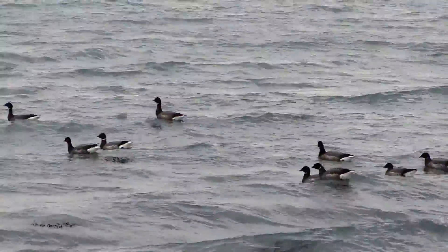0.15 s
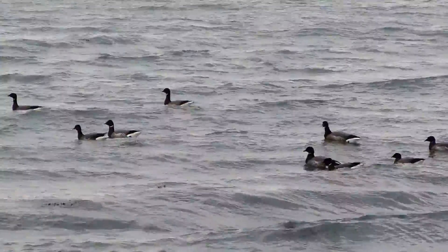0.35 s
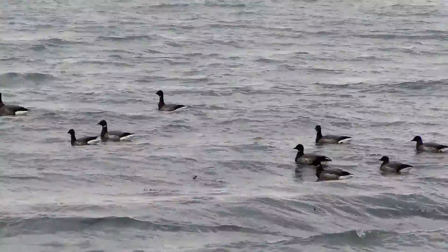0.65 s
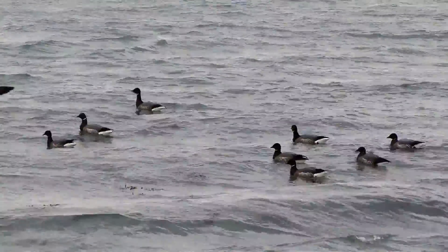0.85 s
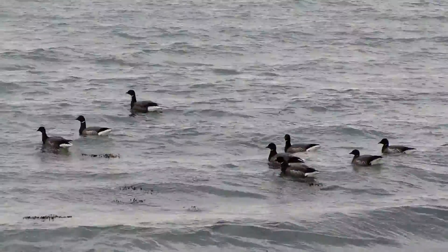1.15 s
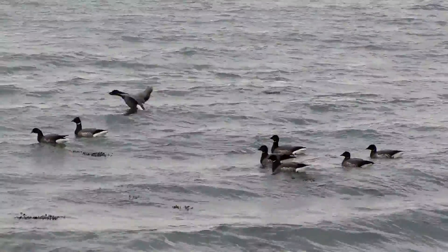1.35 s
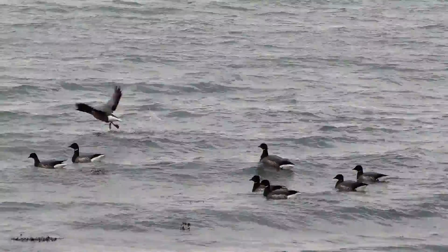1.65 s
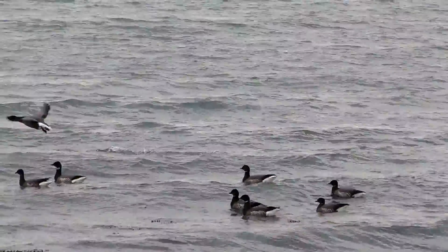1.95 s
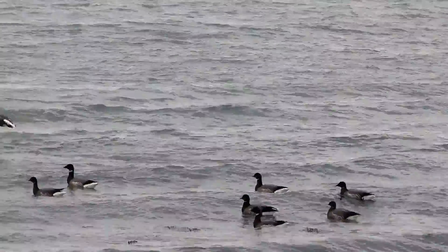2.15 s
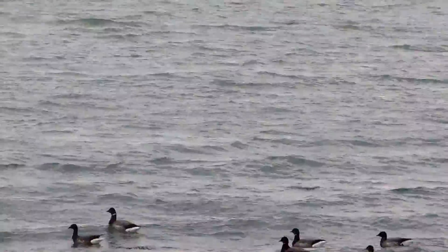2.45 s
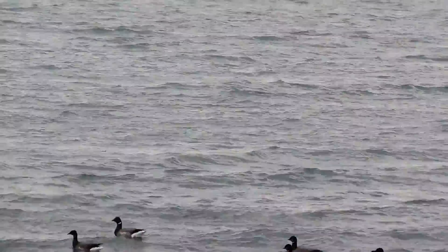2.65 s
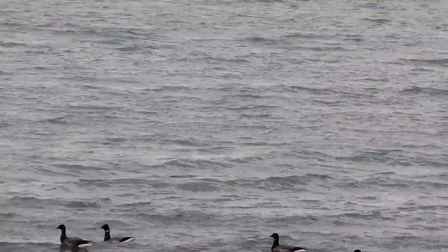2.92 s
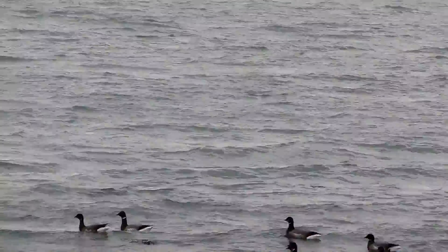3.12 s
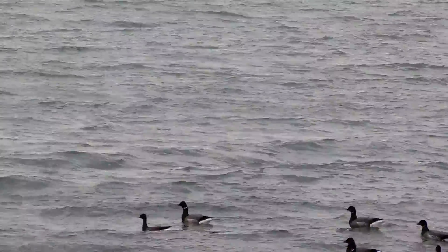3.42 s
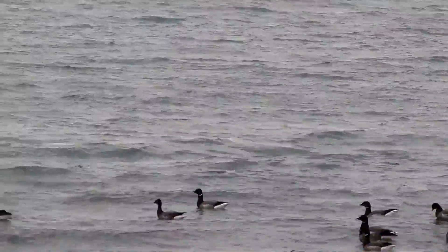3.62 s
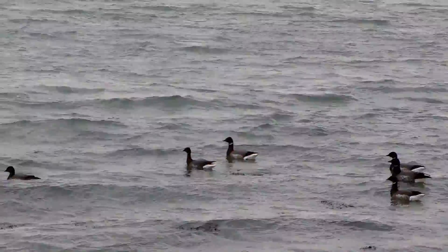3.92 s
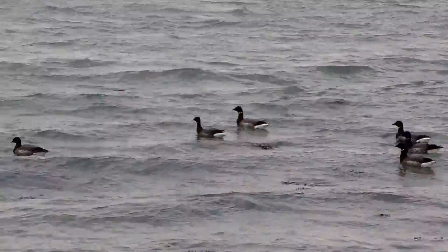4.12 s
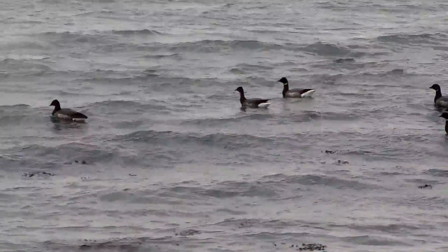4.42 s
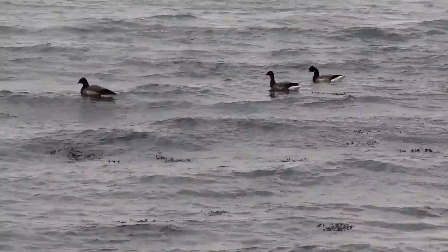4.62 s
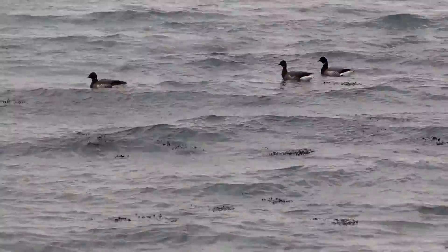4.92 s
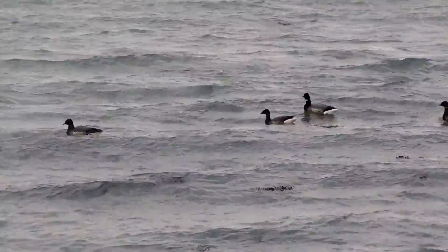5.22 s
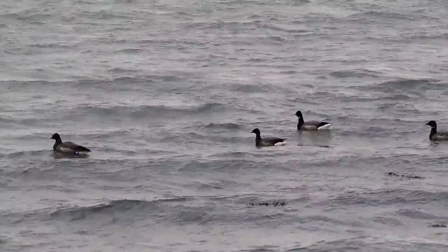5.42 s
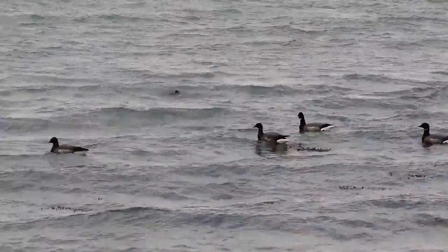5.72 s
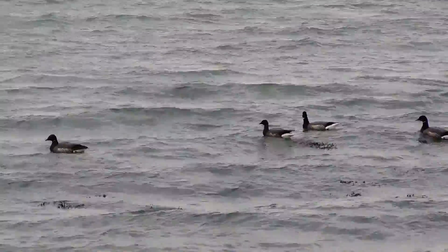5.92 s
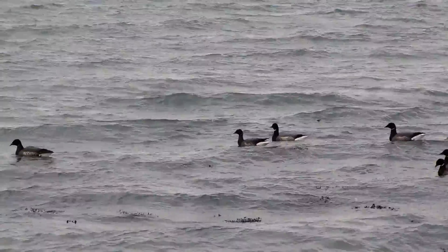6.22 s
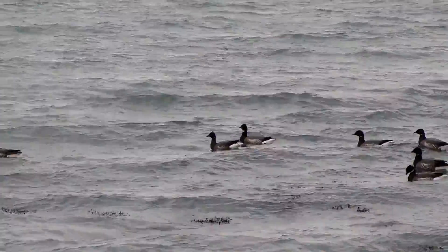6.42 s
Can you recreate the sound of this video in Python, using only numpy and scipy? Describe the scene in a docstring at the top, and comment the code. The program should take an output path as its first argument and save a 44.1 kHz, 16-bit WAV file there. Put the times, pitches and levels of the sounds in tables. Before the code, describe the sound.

Close, choppy water at a windy shore: dull sloshing, bright droplet spatter, small bubbles and fine foam hiss. Just after one second a very loud, dry crack overloads the small camera microphone. The waves ease around two seconds, then swell to their busiest slapping between three and four. Sharp little laps continue, thinning toward the end over a low, faint wind rumble. Brief dropouts make the early part stutter.

```python
"""Ragged sloshing and spatter at a windy shore, over a wash of wavelets and fizz, with single sharper laps.
Gusts choke the small camera microphone for milliseconds at a time, and once overload it with a loud crack.
One train of tiny slaps gates noise and clicks into slosh, spatter, foam and spray; bubbles are decaying sines;
laps are decaying noise; wash and wind are filtered noise; the crack is a chattering swing, a rasp and a ring."""
import sys
import numpy as np
from scipy import signal
from scipy.fft import rfft, irfft, next_fast_len
from scipy.io import wavfile
from scipy.ndimage import uniform_filter1d

SR = 44100
rng = np.random.default_rng(int(sys.argv[2]) if len(sys.argv) > 2 else 0)


def unload_audio(sound):
    """Save the sound as a 16-bit wav file, at the path given as the first command line argument."""
    columns = np.transpose(np.atleast_2d(sound))
    # keep every value between -1 and 1, then stretch to whole-number steps
    steps = np.round(np.clip(columns, -1, 1) * 32767)
    wavfile.write(sys.argv[1], SR, steps.astype(np.int16))


N = 289737
TIME = np.arange(N) / SR

# Chop, swelling as two larger waves come in.
# Each row: time in seconds, slosh level in dB before trims, spatter relative to slosh in dB before trims.
CHOP_LEVELS = [(0, -51.5, 2.5), (0.32, -54, 2), (0.48, -43.5, -8.5), (0.75, -40.5, -12), (1.2, -41.5, -1),
               (1.45, -41, -6), (1.8, -45.5, -5), (2.25, -49.5, -8.5), (2.6, -47.5, -6), (3.05, -43, -5),
               (3.3, -38.5, -0.5), (3.58, -41, -4), (4.03, -38.5, -10.5), (4.3, -45.5, -4.5),
               (4.95, -44, -10), (5.6, -42.5, -9.5), (6.0, -45.5, -9), (6.57, -46.5, -12)]
# Crests that slop over. Each row: centre in seconds, slosh lift in dB, spatter lift in dB (negative: dip).
SLOP_LIFTS = [(0.11, 12, -1), (0.78, 1, 9), (0.89, 2, 7.5), (0.63, -0.5, 0), (1.13, 6, 2), (2.47, 4, 10),
              (2.72, 1, 4), (2.89, 5.5, 7.5), (2.97, 5, 3.5), (3.22, 4, -1), (3.36, 4, -2),
              (3.66, 5.5, 6.5), (3.725, 2, 5), (3.93, -1, 5.5), (4.1, 3, 7), (4.48, 5.5, 4), (4.6, 0, 1.5),
              (4.89, 5, 7.5), (5.32, 0.5, 2.5), (5.81, 1, 8), (6.18, 4, -1)]
# Troughs, where the chop mostly settles. Each row: centre in seconds, level change in dB.
TROUGH_DIPS = [(0.82, -7.5), (1.34, -12), (1.99, -7), (2.80, 3), (3.02, -1.5), (4.31, -3), (4.53, -14),
               (5.26, -8)]
SLOP_WIDTH_S, TROUGH_WIDTH_S = 0.024, 0.01
# Edges of the droplet pitch bands, large to small droplets. Each entry: frequency in Hz.
DROPLET_BAND_EDGES_HZ = [60, 1100, 2000, 3400, 6000, 16000]
# Soft limit on slap force, relative to the rms slap; loss of burst contrast per dB of busyness
SLAP_CEILING, BLEND_PER_DB = 2.4, 0.022

# Hissing foam. Each row: time in seconds, level in dB before scaling and trims.
FOAM_LEVELS = [(0, -54.5), (0.25, -58), (0.7, -63), (1.8, -60), (2.2, -62), (3.35, -62), (4.25, -61.5),
               (4.45, -57.5), (4.8, -62.5), (5.05, -64), (5.3, -59.5), (5.55, -66.5), (6.57, -63.5)]
# Foam sheets that run out and sizzle. Each row: centre in seconds, lift in dB.
SHEET_LIFTS = [(4.37, 6), (4.47, 6), (4.60, 9), (4.81, 11)]
SHEET_WIDTH_S = 0.031
# Loudest bubbles. Each row: start in seconds, starting pitch in Hz, level in dB, decay in cycles.
PLIP_EVENTS = [(0.866, 3540, -23, 2.6), (3.231, 2370, -14, 1.6), (3.17, 2470, -26, 2.3),
               (3.975, 2740, -24, 3.8), (4.09, 1800, -21, 2), (4.856, 1720, -17, 1.7),
               (5.066, 1870, -28, 2.5), (5.747, 2650, -24.5, 1), (6.288, 1870, -15.5, 0.26),
               (6.508, 1410, -28, 2.3), (6.566, 1730, -22, 2)]

# Wavelets that run out. Each row: centre in seconds, wash lift in dB (negative: dip).
RUSH_LIFTS = [(.13, 6), (.45, -3), (2.52, 12), (3.45, -7)]
RUSH_WIDTH_S = 0.23
WASH_START_DB, WASH_EBB_DB_PER_S = -49.5, 3
WIND_START_DB, WIND_RISE_DB_PER_S = -51.5, 0.98

# Microphone chokes. Each row: start in seconds, end in seconds.
CHOKE_SPANS = [(.158, .165), (.177, .182), (.224, .233), (.242, .250), (.334, .338), (.369, .395),
               (.399, .409), (.475, .480), (.852, .865), (.971, 1.015), (1.244, 1.256), (1.544, 1.556),
               (1.568, 1.574), (1.823, 1.846), (1.876, 1.889), (1.908, 1.925), (2.658, 2.665),
               (3.114, 3.119), (5.273, 5.280), (5.814, 5.825)]
# Clearest laps. Each row: start in seconds, level in dB before trims,
# treble relative to that in dB before trims, decay in seconds.
LAP_EVENTS = [(0.408, -24.5, -15, 0.0078), (0.645, -19, -19, 0.005), (0.692, -21, -16, 0.0031),
              (0.71, -20.5, -24, 0.01), (0.777, -23, -20, 0.0054), (0.842, -24, -7.5, 0.0028),
              (0.867, -23, -8, 0.0012), (0.874, -17, -13, .0072), (1.078, -24, -10, 0.0032),
              (1.091, -21.5, -11.5, 0.0034), (1.141, -17, -19.5, 0.0046), (1.365, -33, -9, .0022),
              (1.574, -15, -26, 0.0025), (1.597, -16, -21, 0.0026), (1.626, -19, -18.5, 0.0037),
              (1.702, -26, -9, 0.0025), (1.790, -20.5, -16, 0.0033), (1.815, -18, -20, 0.0019),
              (1.848, -30, -10, 0.0032), (1.924, -25, -9.5, 0.007), (1.954, -19, -22, .005),
              (2.509, -22, -24, 0.0033), (2.560, -20, -24, 0.0035), (2.666, -25.5, -10, 0.0042),
              (2.704, -22.5, -17, 0.011), (2.735, -23.5, -6.5, .0013), (2.901, -28, -10, 0.004),
              (2.964, -18.5, -14, 0.0025), (3.063, -18.5, -16, 0.005), (3.099, -19.5, -13.5, 0.0019),
              (3.122, -16.5, -12.5, 0.0024), (3.201, -23, -14, 0.0095), (3.297, -29.5, -10, 0.0048),
              (3.319, -15, -26, 0.0027), (3.346, -13.5, -21, 0.0029), (3.388, -14.5, -18, 0.0023),
              (3.459, -28, -17.5, 0.0035), (3.534, -25, -9, 0.0011), (3.664, -14.5, -25, 0.0039),
              (3.672, -10, -23, 0.0058), (3.773, -18, -17, 0.0037), (3.825, -14, -19, 0.0043),
              (3.879, -17.5, -11, .0025), (3.892, -18.5, -10.5, 0.0027), (3.918, -20, -21, 0.003),
              (3.930, -10, -29, 0.0037), (4.059, -21, -18, .0067), (4.089, -19, -16.5, .003),
              (4.122, -20, -33, 0.014), (4.469, -20, -22, 0.0039), (4.501, -18, -22, 0.0032),
              (4.545, -21, -20, 0.0033), (4.596, -16.5, -21.5, 0.0068), (4.717, -18, -26, 0.003),
              (4.853, -18.5, -16, 0.0039), (4.899, -17.5, -24, .005), (5.299, -15, -27, 0.0052),
              (5.332, -15, -29, 0.0041), (5.443, -21, -16, 0.0029), (5.529, -25, -16, 0.0033),
              (5.624, -20.5, -38, 0.0043), (5.676, -22.5, -26, 0.0028), (5.803, -24, -12, .0032),
              (5.829, -21.5, -10.5, .004), (6.166, -22, -16, 0.0029), (6.447, -20.5, -21, 0.0049)]
# Crests that throw bright spray. Each row: centre in seconds, level in dB, width in seconds.
SPRAY_EVENTS = [(0.70, -43.5, 0.033), (0.88, -55, .018), (1.10, -41.5, 0.015), (1.17, -44, 0.035),
                (1.38, -42.5, 0.011), (2.91, -67, 0.022), (3.22, -38, 0.016), (3.37, -42, .025),
                (3.66, -43, 0.028), (6.45, -56, 0.007)]
CRACK_S, CRACK_LENGTH_S = 1.2577, 0.0065

# Relative spectrum of the dull slosh. Each row: frequency in Hz, density in dB per Hz.
SLOSH_SPECTRUM = [(40, -46), (100, -37), (220, -12.5), (400, 1.5), (520, -0.5), (750, -4.5), (1100, -10),
                  (1700, -17), (2800, -30.5), (6000, -62.5)]
# Relative spectrum of the droplet spatter. Each row: frequency in Hz, density in dB per Hz.
SPATTER_SPECTRUM = [(60, -44), (300, -14.5), (800, 5.5), (1300, 1), (2200, 0), (3200, -7), (4500, -14.5),
                    (6500, -24.5), (15000, -42)]
# Relative spectrum of the foam fizz. Each row: frequency in Hz, density in dB per Hz.
FIZZ_SPECTRUM = [(1000, -0.5), (3500, 4), (5000, -0.5), (6500, 0), (8500, -2.5), (10200, -6.5), (13000, -7),
                 (15700, -2.5)]
# Relative spectrum of the high foam sizzle. Each row: frequency in Hz, density in dB per Hz.
SIZZLE_SPECTRUM = [(2000, -24), (4500, -6.5), (6200, -11), (7600, -3.5), (8700, -2), (10000, -12.5),
                   (15700, -37)]
# Relative spectrum of the wavelet wash. Each row: frequency in Hz, density in dB per Hz.
WASH_SPECTRUM = [(60, -35), (200, -12), (500, -12.5), (1100, 2.5), (1500, 2.5), (1950, 3), (2450, -10),
                 (3300, -17.5), (6000, -26), (12000, -36)]
# Relative spectrum of the wind rumble. Each row: frequency in Hz, density in dB per Hz.
RUMBLE_SPECTRUM = [(20, -7.5), (60, -31), (110, -14.5), (200, 5.5), (300, 2.5), (500, -0.5), (1200, -36.5)]
# Relative spectrum of the fine spray. Each row: frequency in Hz, density in dB per Hz.
FINE_SPRAY_SPECTRUM = [(800, -59), (2300, 7), (3700, 2.5), (5200, -7), (7000, -11), (10000, -26),
                       (15000, -33)]
# Relative spectrum of the overload rasp. Each row: frequency in Hz, density in dB per Hz.
RASP_SPECTRUM = [(200, 4), (450, 1), (750, 0), (1500, 10), (2600, 9.5), (4000, 6.5), (6000, 2), (7800, -6),
                 (11000, 2.5), (15000, 2)]
# Microphone notches. Each row: centre in Hz, width in Hz.
MIC_NOTCHES = [(300, 150), (900, 174)]
TOP_HZ = 15900


def amp(db):
    """Decibels to gain."""
    return 10 ** (np.asarray(db) / 20)


def unit(x):
    """Scale to rms 1."""
    return x / np.sqrt(np.mean(x ** 2))


def curves(rows):
    """Each column of a table, joined by straight lines in time."""
    s, *columns = np.transpose(rows)
    return [np.interp(TIME, s, column) for column in columns]


def swells(rows, width_s):
    """A Gaussian bell at each time; one summed curve in dB per column of lifts."""
    s, *columns = np.transpose(rows)
    bells = np.exp(-.5 * ((TIME - s[:, None]) / width_s) ** 2)
    return [lift @ bells for lift in columns]


def colour(x, points):
    """Causal minimum-phase filter with the given spectrum; the result has rms 1."""
    hz, db = np.transpose(points)
    size = 2 * next_fast_len(len(x))
    freqs = np.maximum(np.fft.rfftfreq(size, 1 / SR), 1)
    gain = amp(np.interp(np.log(freqs), np.log(hz), db))
    # fold the cepstrum onto positive time
    cepstrum = irfft(np.log(gain))
    cepstrum[1:size // 2] *= 2
    cepstrum[size // 2 + 1:] = 0
    response = np.exp(rfft(cepstrum))
    return unit(irfft(rfft(x, size) * response)[:len(x)])


def noise():
    """White noise."""
    return rng.standard_normal(N)


def walk(rate_hz):
    """Random levels of rms 1, a new one every 1 / rate_hz s, joined by lines."""
    return unit(np.interp(TIME * rate_hz, np.arange(N), noise()))


def even(gain, span_s=0.063):
    """Keep the quick swings of a gain and take out its slow drift."""
    power = uniform_filter1d(gain ** 2, int(span_s * SR))
    return gain / np.sqrt(np.maximum(power, 1e-12))


def drops(rate_hz, spread_db):
    """Sparse clicks of random sign, most small and a few large."""
    hit = rng.random(N) < rate_hz / SR
    sign = np.sign(noise())
    size = np.minimum(rng.exponential(size=N), 2 * np.e)
    return hit * sign * amp(spread_db * size)


def add(out, s, x):
    """Mix a short sound in at time s."""
    i = int(s * SR)
    out[i:i + len(x)] += x[:len(out) - i]


def chop_levels():
    """Slosh and spatter levels in dB: slow swell of the waves, slopping crests and troughs."""
    swell_db, spatter_rel_db = curves(CHOP_LEVELS)
    slosh_lift_db, spatter_lift_db = swells(SLOP_LIFTS, SLOP_WIDTH_S)
    trough_db, = swells(TROUGH_DIPS, TROUGH_WIDTH_S)
    base_db = swell_db + trough_db
    return base_db + slosh_lift_db, base_db + spatter_rel_db + spatter_lift_db


def blend(busy_db):
    """1 in a lull, where slaps and droplets stand apart; less in a busy wave, where they overlap."""
    return 1 - BLEND_PER_DB * np.maximum(busy_db, 0)


def trail(slaps, tail=0.21, tail_s=0.013):
    """Water falls back after each slap and leaves a softer tail."""
    keep = np.exp(-1 / (tail_s * SR))
    return slaps + tail * signal.lfilter([1 - keep], [1, -keep], slaps)


def tumble(busy_db, slap_rate_hz=420, slap_db=1.0, fall_s=0.0011, bed=0.22,
           surge_db=0.8, burst_db=2.2, flick_db=4.0):
    """Tumbling water: tiny slaps start sharply and die within milliseconds, over a churning bed."""
    hits = np.abs(drops(slap_rate_hz, slap_db))
    slaps = signal.lfilter([1], [1, -np.exp(-1 / (fall_s * SR))], hits)
    force = (bed + unit(trail(slaps))) * amp(surge_db * walk(42) + burst_db * walk(150))
    # small chop can only slap so hard
    burst = np.tanh(force / SLAP_CEILING) * amp(flick_db * walk(900))
    return burst ** blend(busy_db)


def chop(burst, busy_db, slosh_db, spatter_db, own_db=2.0, slosh_gain_db=3.0, spatter_gain_db=4.0,
         heave_db=0.5, patchy_db=3.5):
    """Bursts drive a dull slosh and a spatter of droplets, whose sizes, and so pitch, keep changing."""
    slosh_gate = even(burst ** 0.81 * amp(own_db * walk(120)))
    slosh = colour(noise() * slosh_gate, SLOSH_SPECTRUM)
    droplets = 0
    for low_hz, high_hz in zip(DROPLET_BAND_EDGES_HZ, DROPLET_BAND_EDGES_HZ[1:]):
        band = signal.butter(2, [low_hz, high_hz], "bandpass", fs=SR, output="sos")
        clicks = drops(rate_hz=7000, spread_db=4.4 * blend(busy_db))
        droplets += signal.sosfilt(band, even(clicks * burst * amp(patchy_db * walk(220))))
    spatter = colour(droplets, SPATTER_SPECTRUM)
    mix = amp(slosh_gain_db + slosh_db) * slosh + amp(spatter_gain_db + spatter_db) * spatter
    return amp(heave_db * walk(14)) * mix


def foam(burst, busy_db, follow=0.97, fizz_db=6.0, tick_db=-6, sizzle_db=-2,
         fizz_swell=0.7, sizzle_swell=1.82, busy_share=0.091):
    """Foam fizzes with the bursts, more in a busy wave, and ticks; thick foam adds a high sizzle."""
    db, = curves(FOAM_LEVELS)
    usual_db = np.median(db)
    ticks = unit(drops(rate_hz=81, spread_db=2.5))
    grain = noise() * even(burst ** follow) + amp(tick_db) * ticks
    fizz_level_db = usual_db + fizz_db + fizz_swell * (db - usual_db) + busy_share * busy_db
    fizz = colour(grain, FIZZ_SPECTRUM) * amp(fizz_level_db)
    sheet_db, = swells(SHEET_LIFTS, SHEET_WIDTH_S)
    pops = drops(rate_hz=9000, spread_db=3.0) * even(burst ** .5)
    sizzle_level_db = usual_db + sizzle_db + sheet_db + sizzle_swell * (db - usual_db)
    return fizz + colour(pops, SIZZLE_SPECTRUM) * amp(sizzle_level_db)


def bubble(hz, cycles):
    """A bubble rings for a few cycles, rising slightly in pitch."""
    t = TIME[:SR // 40]
    age = t * hz / cycles
    return np.sin(2 * np.pi * hz * t * (1 + 0.026 * np.minimum(age, 4))) * np.exp(-age)


def bubbles(slosh_db, spatter_db, count=900, low_hz=500, high_hz=3400, size_db=-3.5, spread_db=3.5,
            cycles=7.5):
    """The chop traps air: a swarm of short bubbles, each at its own pitch, and a few louder plips."""
    out = np.zeros(N)
    for when, pitch, chance in rng.random((count, 3)):
        i = int(when * N)
        # low bubbles follow the slosh, high ones the spatter
        local_db = (1 - pitch) * slosh_db[i] + pitch * spatter_db[i]
        db = local_db + size_db - spread_db * np.log(chance + 0.017)
        add(out, i / SR, amp(db) * bubble(low_hz * (high_hz / low_hz) ** pitch, cycles))
    for s, hz, db, plip_cycles in PLIP_EVENTS:
        add(out, s, amp(db) * bubble(hz, plip_cycles))
    return out


def wash(flicker_db=3.5):
    """Many wavelets further off blend into a smoother rush of filtered noise."""
    lift_db, = swells(RUSH_LIFTS, RUSH_WIDTH_S)
    level_db = WASH_START_DB - WASH_EBB_DB_PER_S * TIME + lift_db + flicker_db * walk(90)
    return colour(noise(), WASH_SPECTRUM) * amp(level_db)


def wind(flutter_db=2.5):
    """Wind rumble: fluttering low noise that slowly grows."""
    level_db = WIND_START_DB + WIND_RISE_DB_PER_S * TIME + flutter_db * walk(40)
    return colour(noise(), RUMBLE_SPECTRUM) * amp(level_db)


def choke(depth_db=-33):
    """Gain of the microphone: it shuts and reopens abruptly."""
    gain = np.ones(N)
    for start_s, end_s in CHOKE_SPANS:
        gain[int(start_s * SR):int(end_s * SR)] = amp(depth_db)
    return uniform_filter1d(gain, size=24)  # edges of about 0.5 ms


def laps(rise_share=0.093, body_db=-10.5, treble_db=4, mist_db=-17, tick=4):
    """A dull slap with brighter spatter and a trace of fizz; longer laps also start more softly."""
    out, t = np.zeros(N), TIME[:SR // 25]
    for s, db, bright_db, decay_s in LAP_EVENTS:
        shape = (1 - np.exp(-t / (rise_share * decay_s))) * np.exp(-t / decay_s)
        shape /= shape.max()
        slap, drip = rng.standard_normal((2, len(t))) * shape
        drip[np.argmax(shape)] += tick  # the first drop to land
        splash = colour(drip, SPATTER_SPECTRUM) + amp(mist_db) * colour(slap, FIZZ_SPECTRUM)
        lap = amp(body_db) * colour(slap, SLOSH_SPECTRUM) + amp(treble_db + bright_db) * splash
        # undo the rms scaling, so long and short laps peak alike
        add(out, s, amp(db) * lap * np.sqrt(np.mean(shape ** 2)))
    return out


def spray(burst):
    """A breaking crest throws a short shower of fine droplets."""
    level = sum(amp(db) * np.exp(-.5 * ((TIME - s) / width_s) ** 2) for s, db, width_s in SPRAY_EVENTS)
    shower = even(drops(rate_hz=7300, spread_db=3.0) * burst)
    return level * colour(shower, FINE_SPRAY_SPECTRUM)


def crack(thump_hz=166, head_s=0.0002, thump=0.45, chatter_hz=5350, chatter=0.6, wander=0.18, knee=0.42,
          grit=0.42, lead_s=0.0013, lead=.25, ring_hz=940, ring=.68, ring_s=0.0026):
    """Overload: a tick, a swing from side to side, chattering fastest at each extreme, a brief ring."""
    t = TIME[:SR // 25]
    side = np.cos(2 * np.pi * thump_hz * (t + head_s))
    swing = -thump * np.tanh(9 * side)
    hz = chatter_hz * np.tanh(side / knee) ** 2 * (1 + wander * walk(3250)[:len(t)])
    rattle = chatter * np.sin(2 * np.pi * np.cumsum(hz) / SR)
    length = int(CRACK_LENGTH_S * SR)
    rasp = grit * unit(colour(noise(), RASP_SPECTRUM)[len(t):len(t) + length])
    tick = lead * rng.standard_normal(len(t)) * np.exp(-t / 0.00011)
    ringing = ring * np.sin(2 * np.pi * ring_hz * t) * np.exp(-t / ring_s)
    out = np.zeros(N)
    add(out, CRACK_S - lead_s, tick)
    add(out, CRACK_S, (swing + rattle)[:len(rasp)] + rasp)
    add(out, CRACK_S + CRACK_LENGTH_S, ringing)
    return out


def knock(knock_hz=600, knock_db=-15, decay_s=0.00097, buzz_db=-27, buzz_s=0.0067):
    """A short dull knock gives the crack its body; a faint noisy buzz dies away after it."""
    t, out = TIME[:SR // 25], np.zeros(N)
    body = amp(knock_db) * np.sin(2 * np.pi * knock_hz * t) * np.exp(-t / decay_s)
    buzz = amp(buzz_db) * colour(rng.standard_normal(len(t)), SPATTER_SPECTRUM) * np.exp(-t / buzz_s)
    add(out, CRACK_S, body)
    add(out, CRACK_S + CRACK_LENGTH_S, buzz)
    return out


def notch(x):
    """The microphone is deaf in two narrow bands."""
    for hz, width_hz in MIC_NOTCHES:
        x = signal.lfilter(*signal.iirnotch(hz, hz / width_hz, fs=SR), x)
    return x


def bass_cut(x, cut_hz=60):
    """First-order high-pass: the deepest bass is weakened."""
    return signal.sosfilt(signal.butter(1, cut_hz, "highpass", fs=SR, output="sos"), x)


def scene():
    """Water and wind, choked and notched by the microphone, plus its crack."""
    slosh_db, spatter_db = chop_levels()
    busy_db = spatter_db - np.mean(spatter_db)
    burst = tumble(busy_db)
    water = chop(burst, busy_db, slosh_db, spatter_db) + foam(burst, busy_db)
    water += bubbles(slosh_db, spatter_db) + laps() + spray(burst) + wash()
    outdoors = notch(choke() * (water + wind()))
    overload = bass_cut(crack() + knock())
    return (outdoors + overload)[None]


def record(dry):
    """The camera clips at full scale and cuts the top with a steep low-pass."""
    low_pass = signal.ellip(10, .2, 80, TOP_HZ, fs=SR, output="sos")
    return signal.sosfilt(low_pass, np.clip(dry, -1, 1))


dry = scene()
out = record(dry)
unload_audio(out)
```